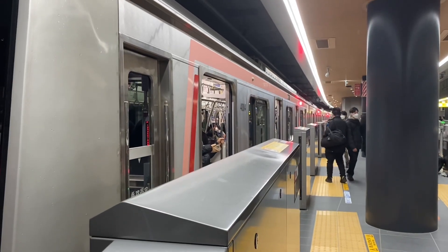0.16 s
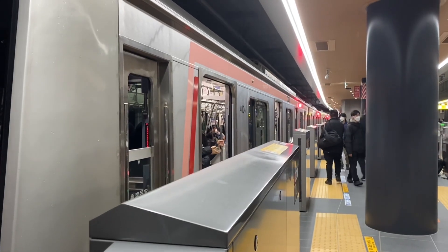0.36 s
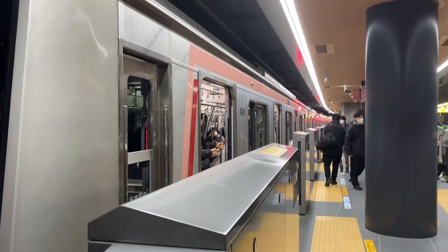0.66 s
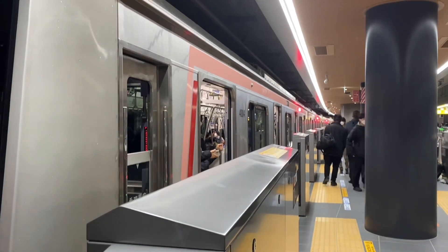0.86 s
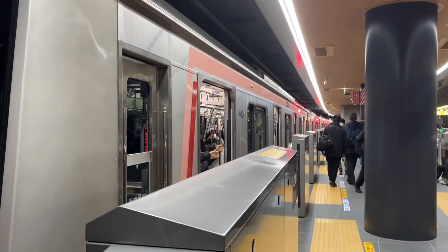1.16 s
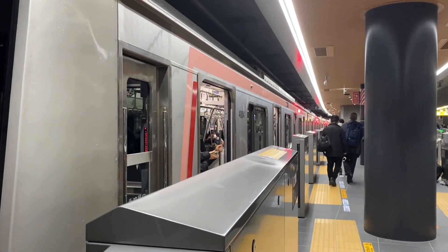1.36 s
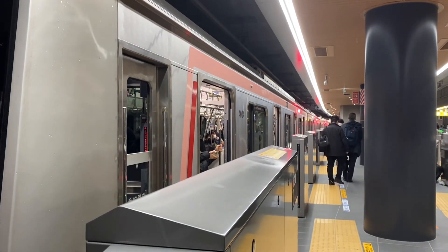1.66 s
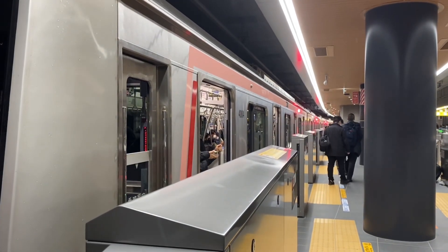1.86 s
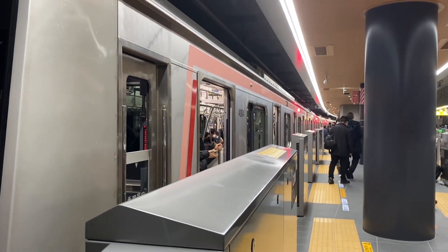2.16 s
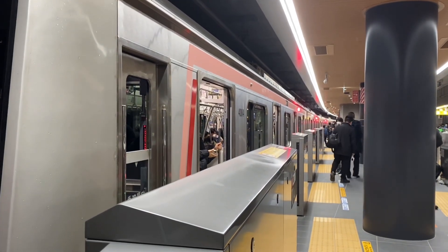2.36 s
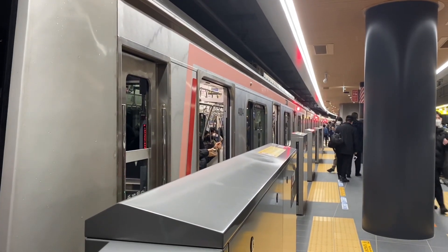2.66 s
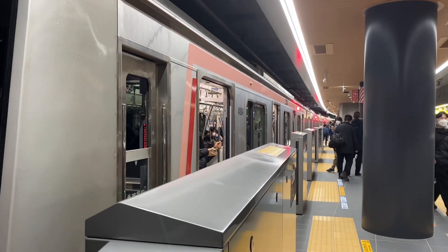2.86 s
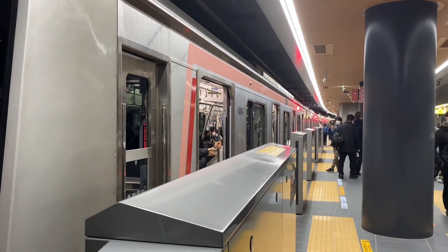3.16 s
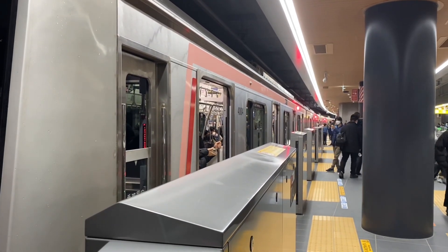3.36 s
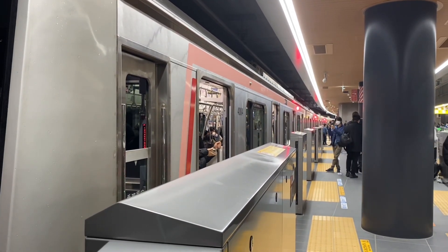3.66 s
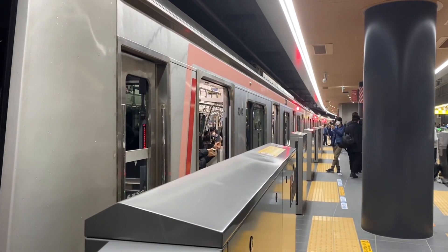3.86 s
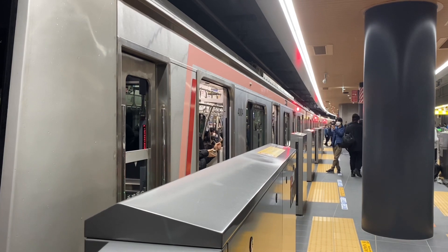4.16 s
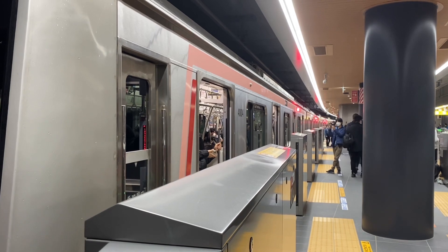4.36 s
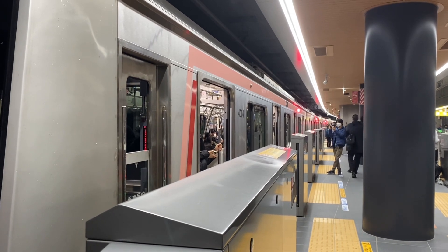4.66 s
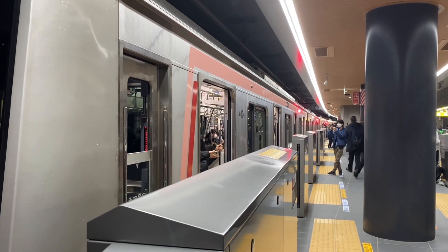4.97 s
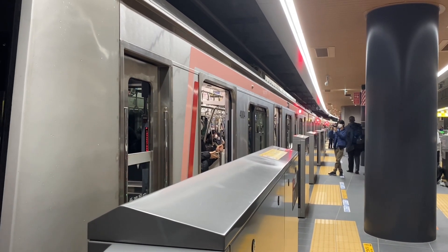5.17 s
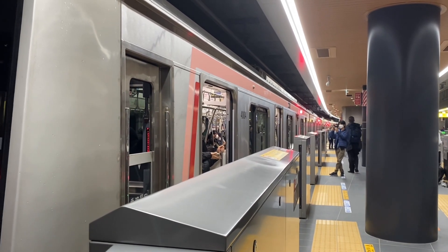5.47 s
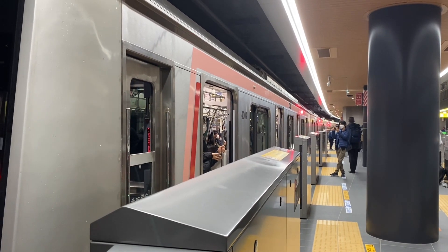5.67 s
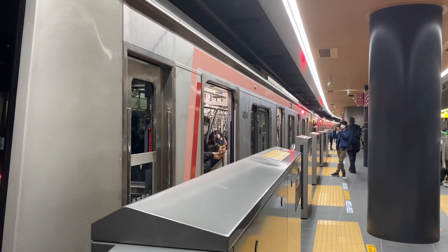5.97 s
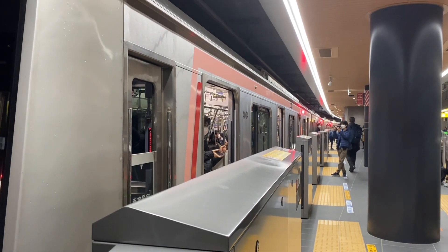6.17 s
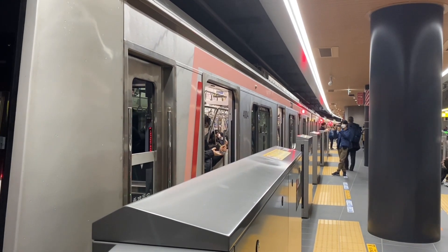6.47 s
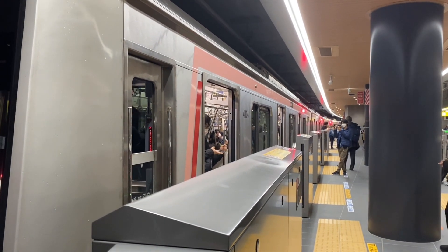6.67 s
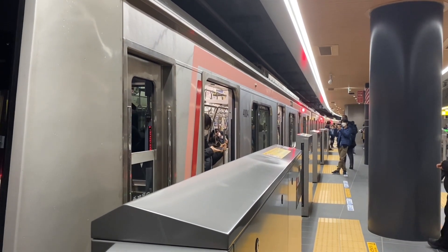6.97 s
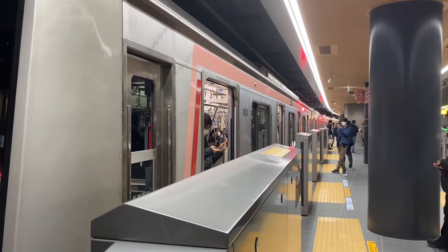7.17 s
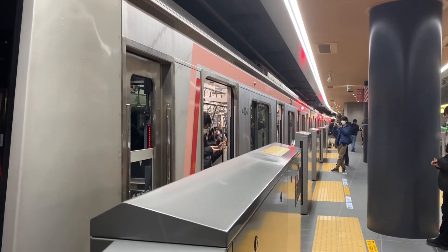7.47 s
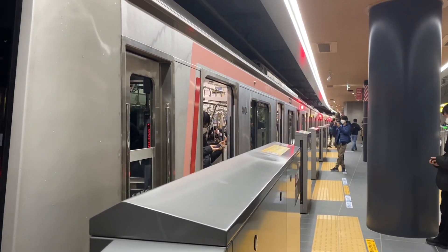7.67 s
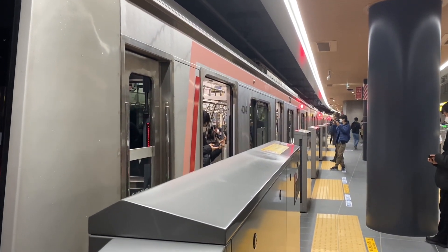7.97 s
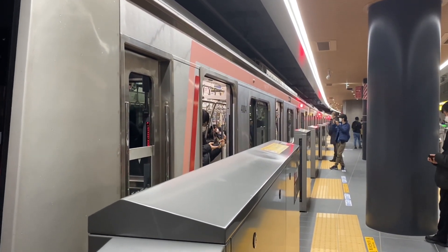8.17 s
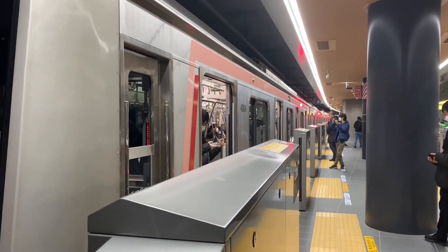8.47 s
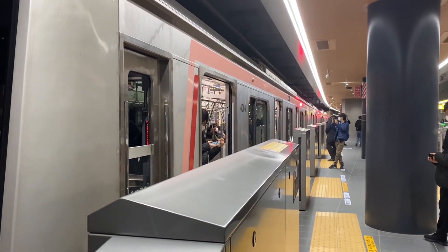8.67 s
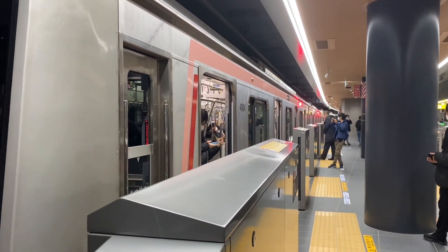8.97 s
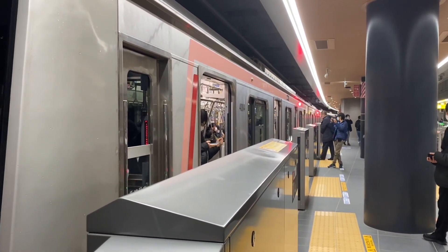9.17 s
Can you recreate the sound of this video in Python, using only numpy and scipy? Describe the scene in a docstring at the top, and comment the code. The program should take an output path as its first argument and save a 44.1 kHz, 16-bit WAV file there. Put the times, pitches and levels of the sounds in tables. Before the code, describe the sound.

A train stands with open doors at an underground platform, heard in wide stereo with light station reverberation. From 0 s, fans give a broad rush of air, a high, finely grained whistling hiss sits to the right, and a low motor hum holds one note slightly left. Soft dull knocks come in quick irregular succession, one firmer near 1.2 s. Around 0.5 s a narrow, wavering blade tone stands out, then fades and returns throughout. At about 1.5 s machinery takes up load: a deep, booming rumble swells, the hum strengthens and a faint rattle joins. By 2 s it is full and dominates, throbbing, surging and sagging. Muffled knocks continue sparsely, with a denser, sharper cluster around 7.8 to 8.3 s. The hiss's very top dips briefly near 6.8 s and repeatedly from 8 s. The rumble and air continue until the end, past 9 s.

```python
"""A train stands with open doors at an underground platform, heard from two spaced microphones.
From the start its fans wash the station with air noise, a whistling hiss comes from the right, a motor hums
and dull knocks ring damped modes. After half a second a wavering blade tone, a narrow band of noise, stands out.
From about 1.5 s a deep, resonant rumble of shaped noise swells around the louder hum with a faint rattle;
by about two seconds it is full, and it stays, surging and sagging, while knocks go on now and then."""
import sys
import numpy as np
from scipy import signal
from scipy.fft import rfft, irfft
from scipy.io import wavfile
from scipy.ndimage import uniform_filter1d, map_coordinates

SR = 44100
rng = np.random.default_rng(int(sys.argv[2]) if len(sys.argv) > 2 else 0)


def pcm_store(signal):
    """Save signal as 16-bit PCM."""
    levels = np.round(np.clip(np.atleast_2d(signal), -1, 1) * 32767)
    wavfile.write(sys.argv[1], SR, levels.astype(np.int16).T)


N = 411012  # length of the scene in samples

# duct resonances, heard in the air noise and the rumble: [f/Hz, width/Hz, level/dB]
DUCT_RESONANCES = [(482.8, 16.8, 4.8), (512.6, 15.8, 2.0), (579.4, 9.6, 3.1), (622.5, 23.8, 3.2),
                   (641.0, 9.7, -2.2), (693.3, 13.1, 5.3), (729.5, 11.8, 1.3), (775.4, 35.4, 1.7),
                   (830.6, 18.2, -2.4), (869.8, 24.4, 2.8), (913.1, 38.2, 3.9), (1012.3, 40.5, -2.7),
                   (1092.8, 31.1, 3.1), (1129.2, 22.0, 3.0), (1243.0, 10.6, 1.8), (1284.8, 18.0, 2.4),
                   (1344.0, 27.6, 4.2)]
# the machinery takes up load: start and length of the rise
LOAD_ON_S, LOAD_RISE_S = 1.46, 0.28


def fans(level_db=-0.5, rush_db=-0.6, flutter_db=0.22, waver_db=0.5):
    """Air rushing through ducts, coloured by the far walls; the lower part grows as the fans come up to speed."""
    # air noise spread through the station, before the trims: [f/Hz, density/dB per Hz]
    air_noise = [(25, -78), (45, -50), (70, -60), (180, -58.5), (330, -58.5), (550, -62), (800, -61.5),
                 (1020, -65), (1400, -66), (1800, -68.5), (2400, -72), (3000, -76), (3500, -77.5),
                 (3950, -79), (4320, -77), (4700, -79.5), (5200, -80), (5900, -81), (6500, -80.5),
                 (7300, -80), (9000, -125)]
    spin_up_db, spin_up_s = -2, 2.9  # level of the lower air noise at the start, time when it is full
    walls_db = 1.3 * np.array([ripple(spacing_hz=11), ripple(spacing_hz=11)])
    # the longest waves are hardly coloured
    echoes_db = walls_db * np.minimum(bins() / 1500, 1)
    air = diffuse(at_hz(air_noise) + resonances(DUCT_RESONANCES) + echoes_db)
    low, high = split(air, hz=1820)
    flow_db = level_db + spin_up_db * (1 - ramp(0, spin_up_s)) + waver_db * drift(rate=7)
    # the upper rush has a fine grain
    high = patchy(high, depth_db=3.8, width_hz=50, rate=30)
    high_db = rush_db + flutter_db * drift(rate=11)
    return low * from_db(flow_db) + high * from_db(high_db)


def blade_tone(level_db=-44.5, pan_db=-3.0, waver_db=2.5, swing_s=0.36):
    """Fans at nearly the same speed blur into one narrow tone that fades and returns as they beat."""
    # brief fades and swells of the tone: [t/s, level/dB]
    blade_swings = [(.58, 6), (.78, -3), (1.03, -10), (2.55, -6), (3.22, -4), (4.14, -8), (4.68, -4),
                    (4.99, -5), (5.28, -10), (6.09, -7), (6.3, 5.5), (6.85, -6), (7.38, -3), (7.72, -5),
                    (8.31, -12), (8.53, 2), (8.88, -4)]
    on_s, rise_s, off_db = 0.43, .06, -12  # onset, length of the rise, relative level before it
    rate_hz, width_hz, wander_hz = 941, 30, 3  # mean blade rate, spread of the rates, common wander
    blades_db = level_db + off_db * (1 - ramp(on_s, rise_s)) + waver_db * drift(rate=10)
    blades_db = blades_db + sum(db * bump(s, swing_s) for s, db in blade_swings)
    band_db = -10 * np.log10(1 + (2 * (bins() - rate_hz) / width_hz) ** 8)
    tone = diffuse(band_db)
    # the whole band shifts up and down in frequency
    wander = np.exp(2j * np.pi * np.cumsum(wander_hz * drift(rate=8)) / SR)
    tone = np.real(signal.hilbert(tone) * wander)
    return steadied(tone, span_s=0.16) * from_db(blades_db) * panned(pan_db)


def rumble(judder_db=1.53):
    """Machinery takes up load and shakes the car body; its droning, booming and deep parts throb on their own."""
    # spectral shape of the rumble, its level set by part below: [f/Hz, relative density/dB per Hz]
    rumble_shape = [(15, -74), (30, -57), (40, -45.5), (55, -41), (72, -40.5), (110, -45), (160, -42),
                    (195, -44), (215, -48.3), (300, -51.3), (370, -55), (420, -58.3), (700, -62.5),
                    (1500, -79.5), (4000, -125)]
    # booming resonances of the car body and tunnel: [f/Hz, width/Hz, level/dB]
    booms = [(67.3, 3.0, 1.9), (74.5, 3.0, 2.3), (100.2, 3.8, 5.4), (116.9, 4.3, 5.3), (130.5, 5.9, 2.4),
             (140.9, 3.6, 4.8), (150.8, 5.2, -3.6), (157.3, 6.3, 6.9), (169.5, 15.0, -4.1),
             (175.9, 3.3, 6.4), (184.5, 3.0, 6.6), (197.7, 10.2, 5.4), (209.0, 4.4, -3.8),
             (224.4, 4.4, 4.0), (230.0, 4.9, 4.1), (250.9, 3.0, 2.5), (260.0, 3.4, 2.7), (274.3, 15.0, 7.2),
             (295.6, 15.0, 3.2), (322.5, 6.4, 5.2), (336.3, 4.8, 4.4), (398.3, 11.3, 4.4)]
    # drone, boom and deep part in turn: [level before the swell/dB, level under load/dB, throb/dB]
    rumble_parts = [(-47, -32.5, 1.0), (-34, -23.5, 0.75), (-36.5, -23.5, 0.26)]
    # surges and sags: [t/s, length/s, deep part/dB, boom and drone/dB]
    surges = [(1.443, 0.16, 9, -2), (1.6, 0.23, 0, 0), (2.1, 0.3, -1.5, 0.5), (2.5, 0.4, -1, -1),
              (2.896, 0.33, 1, 3), (3.35, 0.22, -1.5, 1.5), (3.756, 0.43, 4, -1.5), (4.067, 0.32, 0, 1.5),
              (4.55, 0.55, 4, 0.5), (5.384, 0.48, -5, 0.5), (5.582, 0.34, 0.5, -1), (5.83, 0.34, 5, -1),
              (6.145, 0.39, 3.5, 1), (6.454, 0.25, 1.5, -2.5), (6.936, .26, -3.5, 0), (7.45, .4, 0, -1.5),
              (7.89, 0.43, 3, 2.5), (8.747, 0.4, -2.5, 2), (9.205, 0.21, -3.5, -1.5)]
    load_lag_s = 0.15  # the swell reaches the drone first, then the boom, then the deep part
    shaken = diffuse(at_hz(rumble_shape) + resonances(booms + DUCT_RESONANCES))
    deep, rest = split(shaken, hz=102.4)
    boom, drone = split(rest, hz=211.4)
    parts = []
    for k, (part, settings) in enumerate(zip((drone, boom, deep), rumble_parts)):
        idle_db, loaded_db, throb_db = settings
        load = ramp(LOAD_ON_S + k * load_lag_s, LOAD_RISE_S)
        level_db = idle_db + (loaded_db - idle_db) * load + throb_db * drift(rate=12)
        parts.append(steadied(part, span_s=0.3) * from_db(level_db))
    drone, boom, deep = parts
    deep_surge_db = sum(db * bump(s, length_s) for s, length_s, db, _ in surges)
    upper_surge_db = sum(db * bump(s, length_s) for s, length_s, _, db in surges)
    upper_db = upper_surge_db + judder_db * drift(rate=30)
    return deep * from_db(deep_surge_db) + (boom + drone) * from_db(upper_db)


def hum(pan_db=3.0, waver_db=1.5):
    """A motor holds one low note, a slightly wandering sine, louder under load and to the left."""
    note_hz, idle_db, load_db = 184.4, -42, 4.5  # mean pitch, level at idle, rise under load
    pitch_hz = note_hz + .6 * drift(rate=3)
    level_db = idle_db + load_db * ramp(LOAD_ON_S, LOAD_RISE_S) + waver_db * drift(rate=4.6)
    note = np.sqrt(2) * np.sin(2 * np.pi * np.cumsum(pitch_hz) / SR)
    return note * from_db(level_db) * panned(pan_db)


def hiss(level_db=-4.5, top_db=4.0, flutter_db=0.3):
    """A whistling equipment hiss from the right reaches the left microphone a moment later."""
    # spectrum of the hiss, before the trims: [f/Hz, density/dB per Hz]
    hiss_shape = [(3000, -108), (5300, -92), (5900, -87), (6250, -80), (7200, -79.3), (8200, -78.3),
                  (9000, -81), (9700, -80), (11000, -82.7), (12300, -83), (12700, -96), (13700, -101),
                  (14300, -110)]
    # whistles in the hiss: [f/Hz, width/Hz, level/dB]
    whistles = [(4986, 22, 17), (5571, 20, 12.5), (5889, 20, 10.5), (6240, 40, 6), (6686, 22, 7),
                (7080, 26, 5), (7547, 22, 3.5), (8096, 20, 4), (8252, 30, 5), (8301, 25, 4.5),
                (8500, 22, 4.5), (8694, 22, 3.5), (9253, 22, 5), (10524, 28, 3.5), (10799, 20, 4.5)]
    # brief dips of the top of the hiss: [t/s, length/s, level/dB]
    hiss_dips = [(6.83, .4, -4), (7.97, 0.52, -6), (8.416, 0.67, -9.5), (8.97, 0.6, -11)]
    lag_s = .000273  # extra travel time to the left microphone
    direct = white(count=1) * np.exp(-2j * np.pi * bins() * np.array([[lag_s], [0]]))
    scattered = from_db(-19) * white(count=2)
    colour_db = at_hz(hiss_shape) + resonances(whistles) + 1.6 * ripple(spacing_hz=14)
    coloured = irfft((direct + scattered) * from_db(colour_db + level_db), N)
    body, top = split(coloured, hz=10400)
    body = patchy(body, depth_db=4.3, width_hz=50, rate=24)
    # only the shortest waves fade and return
    dips_db = sum(db * bump(s, length_s) for s, length_s, db in hiss_dips)
    return (body + top * from_db(top_db + dips_db)) * from_db(flutter_db * drift(rate=18))


def knocks():
    """Soft blows, the shudder after each and a loose rattle set damped modes ringing, with a short station tail."""
    # dull knocks, strengths before the mode levels; the shudder falls to 1/e in twice its time:
    # [t/s, thud/dB, crack/dB, shudder/s]
    blows = [(0.062, -19, -20.5, .018), (0.086, -22, -21, .008), (0.118, -22, -24, .008),
             (0.246, -16.5, -20.5, .012), (0.263, -17, -28, .012), (0.384, -20, -21.5, .014),
             (0.559, -26, -24, .006), (0.795, -17, -20, .014), (0.962, -25, -27, .008),
             (1.062, -22.5, -21, .008), (1.168, -11.5, -14, .012), (1.188, -16, -28, .008),
             (1.347, -22, -26, .01), (1.374, -24, -23, .008), (1.412, -23, -24, .012),
             (1.457, -24, -23, .02), (1.549, -22, -19, .012), (1.561, -22, -19, .014),
             (1.666, -20, -27, .012), (1.695, -22, -22, .02), (1.722, -20, -22, .035),
             (1.834, -16, -25, .035), (2.336, -16, -20, .018), (2.915, -14, -22, .012),
             (2.96, -15, -19, .012), (3.026, -14, -24, .015), (3.16, -14, -26, .025),
             (3.53, -15, -23, .018), (3.868, -16, -22, .012), (4.121, -13.5, -26, .012),
             (4.416, -13.5, -26, .01), (4.884, -15.5, -23, .008), (4.94, -15, -23, .012),
             (5.77, -15, -28, .014), (5.828, -12, -27, .022), (6.176, -12.5, -24, .02),
             (6.316, -20, -23, .012), (6.567, -17, -21, .01), (7.125, -19, -21, .012),
             (7.824, -16, -25, .025), (7.868, -12, -27, .012), (7.926, -14, -28, .008),
             (7.982, -12.5, -13.5, .018), (8.026, -9.5, -24, .005), (8.088, -21, -20, .008),
             (8.16, -15, -17, .012), (8.169, -12, -17, .02), (8.263, -12, -11.5, .008),
             (8.301, -17, -24, .018), (8.725, -17, -22, .025), (8.853, -20, -22, .01)]
    # what the knocks ring with: [f/Hz, level/dB, t60/s]
    knock_modes = [(92, -4, .06), (145, 0, .1), (205, -1.5, .06), (315, -.5, .028), (460, 1, .022),
                   (660, -.3, .014), (900, -7, .008)]
    shudder_per_s, shudder_db = 300, -7.5  # smaller, uneven contacts after a blow, relative to it
    rattles_per_s, rattle_db, rattle_spread_db = 18, -27, 1.8  # faint rattling under load
    since = np.arange(SR // 5) / SR  # seconds after the blow
    shape = (len(blows), len(since))
    contacts = (rng.random(shape) < shudder_per_s / SR) * rng.uniform(-0.79, 1, shape)
    # each blow excites the modes a little differently
    chance_db = rng.normal(0, 1.5, (len(blows), len(knock_modes)))
    rattling = (rng.random(N) < rattles_per_s / SR) * ramp(LOAD_ON_S, LOAD_RISE_S)
    out = np.zeros(N)
    for k, (hz, mode_db, t60) in enumerate(knock_modes):
        uneven_db = rattle_spread_db * rng.standard_normal(N)
        clicks = 1e-18 + rattling * from_db(rattle_db + mode_db + uneven_db)
        for i, (s, thud_db, crack_db, shudder_s) in enumerate(blows):
            blow = from_db(shudder_db) * contacts[i] * np.exp(-(since / shudder_s / 2) ** 2)
            blow[0] = 1
            # the thud feeds the low modes, the crack the upper ones
            blow_db = thud_db if hz < 400 else crack_db
            at = round(s * SR)
            clicks[at:at + len(blow)] += blow * from_db(blow_db + mode_db + chance_db[i, k])
        # a two-pole resonator rings as a decaying sine; neighbouring modes have opposite signs
        r = from_db(-60 / (t60 * SR))
        w = 2 * np.pi * hz / SR
        ringing = signal.lfilter([0, np.sin(w)], [1, -2 * r * np.cos(w), r * r], clicks)
        out += (-1) ** k * ringing
    # a soft contact has little treble, and a small panel radiates little deep bass
    out = signal.sosfilt(signal.butter(2, [60, 1000], "band", fs=SR, output="sos"), out)
    tail_t60, tail_db = .3, -13  # decay time of the station in s, its level
    echoes = rng.standard_normal((2, SR)) * from_db(-60 * np.arange(SR) / SR / tail_t60)
    echoes = echoes / (rms(echoes) * np.sqrt(SR))
    tail = signal.fftconvolve(out[None], echoes, axes=1)[:, :N]
    return out + from_db(tail_db) * tail


def diffuse(spectrum_db):
    """Noise from all round: alike at both spaced microphones in the bass, mostly less so higher up."""
    # the station at the two microphones: [f/Hz, correlation]
    likeness = [(60, .93), (150, .89), (330, .6), (600, .22), (1000, .27), (1350, .09), (1650, -.43),
                (2100, -.3), (2700, .2), (3400, .07), (4300, .62), (5200, .1), (6000, .35)]
    # left minus right: [f/Hz, level/dB]
    balance = [(70, 0.5), (170, 1.4), (350, 0.5), (600, 0.3), (900, 0), (1250, 0.5), (1800, -2.5),
               (2700, 0), (4200, -0.3), (5200, 1.4)]
    # the sound reaches the right microphone first: [f/Hz, phase/rad]
    right_leads = [(60, .05), (300, .3), (600, .55), (1250, .8), (1550, 0), (3500, .3), (4300, 0)]
    mid, side = white(count=2)
    alike = np.clip(at_hz(likeness), -.99, .99)
    pair = np.sqrt((1 + alike) / 2) * mid + np.sqrt((1 - alike) / 2) * side * [[1], [-1]]
    pair = pair * np.exp(.5j * at_hz(right_leads) * [[-1], [1]])
    return irfft(pair * from_db(spectrum_db) * panned(at_hz(balance)), N)


def patchy(x, depth_db, width_hz, rate):
    """Narrow bands of a sound flicker, each on its own, with gains of overall RMS 1."""
    hz, s, cells = signal.stft(x, SR, nperseg=1024)
    knots = rng.standard_normal((800, 400))
    where = np.meshgrid(hz / width_hz, s * rate, indexing="ij")
    gain = from_db(depth_db * map_coordinates(knots, where, order=1, mode="wrap"))
    return signal.istft(cells * gain / rms(gain), SR)[1][:, :N]


def steadied(x, span_s):
    """Stereo noise with the slow level of its two-channel mean evened to 1."""
    power = x.mean(axis=0) ** 2
    for _ in range(2):
        power = uniform_filter1d(power, max(int(span_s * SR), 2))
    return x / np.sqrt(np.maximum(power, 1e-14))


def split(x, hz):
    """The parts of a sound below and above a frequency."""
    low = irfft(rfft(x) / (1 + (bins() / hz) ** 16), N)
    return low, x - low


def panned(db):
    """Left and right gains for a level difference, left minus right."""
    return from_db(np.array([[1], [-1]]) * db / 2)


def white(count):
    """Spectra of unrelated white noises of 0 dB per Hz."""
    return rfft(rng.standard_normal((count, N))) * np.sqrt(SR / 2)


def ripple(spacing_hz):
    """Reflections add and cancel at random frequencies: a fixed ripple joined from knots of spread 1."""
    knots = rng.standard_normal(8000)
    return np.interp(bins() / spacing_hz, np.arange(len(knots)), knots)


def resonances(rows):
    """Gain in dB of a set of bell-shaped resonances."""
    return sum(db / (1 + (2 * (bins() - hz) / width) ** 2) for hz, width, db in rows)


def at_hz(points):
    """A table over frequency, joined on a log axis."""
    hz, value = np.transpose(points)
    return np.interp(np.log(bins()), np.log(hz), value)


def bins():
    """Frequency of each spectral bin in Hz, at least 1."""
    return np.maximum(np.arange(N // 2 + 1) * SR / N, 1)


def drift(rate):
    """A slow random wander joined from knots of spread 1, rate knots per second."""
    knots = rng.standard_normal(2000)
    return np.interp(np.arange(N) / SR * rate, np.arange(len(knots)), knots)


def ramp(start_s, rise_s):
    """A straight rise from 0 to 1 that then holds."""
    return np.clip((np.arange(N) / SR - start_s) / rise_s, 0, 1)


def bump(s, length_s):
    """A smooth rise to 1 and back, centred on a moment."""
    return np.sin(np.pi * ramp(s - length_s / 2, length_s)) ** 2


def from_db(db):
    """Decibels to gain."""
    return 10 ** (np.asarray(db) / 20)


def rms(x):
    """Root mean square of a whole signal."""
    return np.sqrt(np.mean(x ** 2) + 1e-20)


def scene():
    """Everything that sounds on the platform."""
    return fans() + blade_tone() + rumble() + hum() + hiss() + knocks()


def record(dry):
    """The recorder opens and closes softly and cuts the top steeply."""
    cutoff_hz = 14500
    opening = ramp(0, .003)
    faded = dry * opening * opening[::-1]
    return signal.sosfilt(signal.ellip(10, .1, 80, cutoff_hz, fs=SR, output="sos"), faded)


dry = scene()
out = record(dry)
pcm_store(out)
```